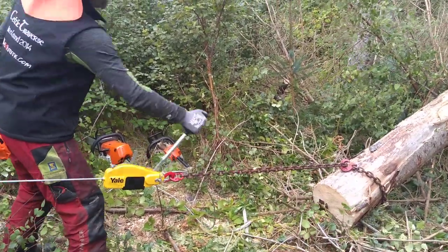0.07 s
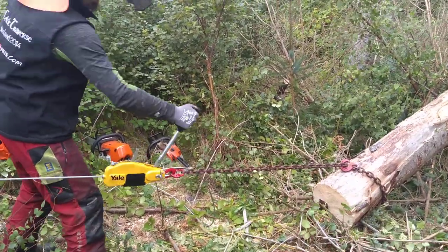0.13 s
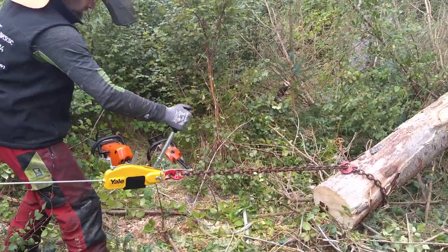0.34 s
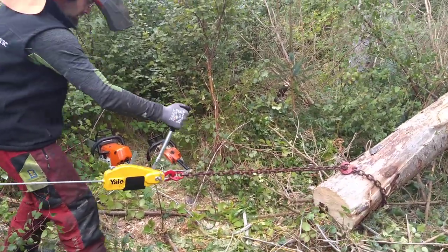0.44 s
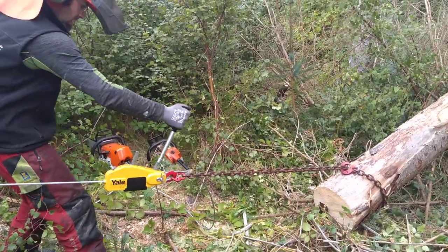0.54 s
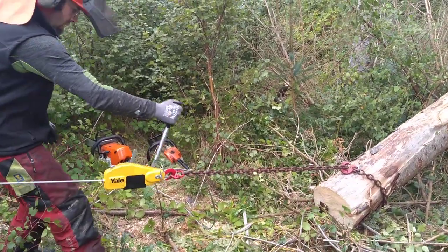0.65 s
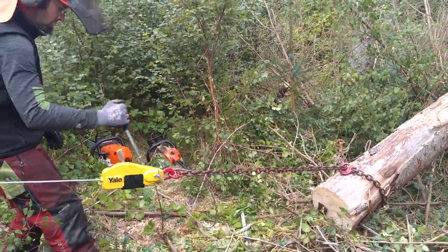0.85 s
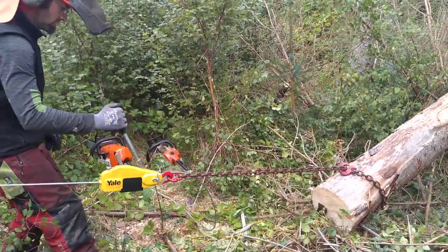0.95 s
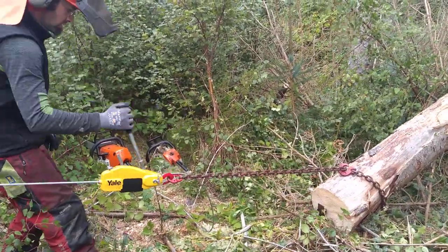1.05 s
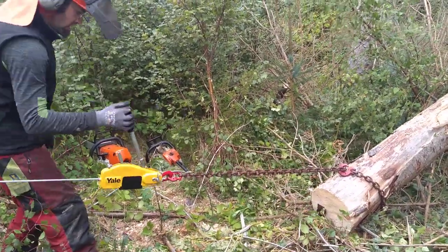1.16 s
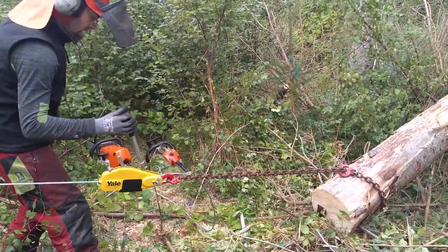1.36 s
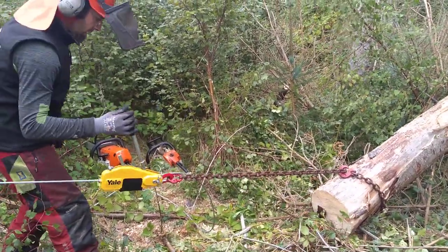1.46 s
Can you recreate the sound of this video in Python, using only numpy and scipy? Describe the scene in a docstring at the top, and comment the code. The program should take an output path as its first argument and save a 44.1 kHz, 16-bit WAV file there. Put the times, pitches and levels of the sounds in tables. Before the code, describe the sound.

A hand winch ratchets a few metres ahead in quiet woodland. Ringing metallic clacks cluster from 0.2 to 0.3 seconds, come doubled near 0.5, 0.65 and 0.8, then bunch again around 1.0. To the left, clothes and leaves rustle softly, boots scuff and twigs tick. A boot lands on dry leaves at 1.2 seconds, and two faint winch clicks follow near 1.45.

```python
"""In woodland, a few metres away, someone works the lever of a hand winch. Its pawl (the catch that
stops it unwinding) clacks over the toothed wheel, often twice, and makes the metal housing ring.
To the left, clothes and leaves rustle, twigs tick, boots shift and one comes down on dry leaves.
Quiet air lies behind it all. The recorder widens the sound of its two microphones by feeding
each into the other, late and upside down."""
import sys
import numpy as np
from scipy import signal
from scipy.fft import rfft, irfft
from scipy.io import wavfile

SR = 44100
rng = np.random.default_rng(int(sys.argv[2]) if len(sys.argv) > 2 else 0)


def generate_wav(sig):
    """Save sig (samples, or channels by samples) to the path in sys.argv[1] as 16-bit PCM at SR."""
    pcm = np.round(np.clip(np.atleast_2d(sig).T, -1, 1) * 32767).astype(np.int16)
    wavfile.write(sys.argv[1], SR, pcm)


N = 66150  # 1.5 seconds


def undb(db):
    """Turn decibels into a number to multiply by."""
    return 10 ** (np.asarray(db) / 20)


def shape(x, points):
    """Change the tone of a sound along a curve of points: f/Hz, level/dB."""
    hz, db = np.array(points, float).T
    f = np.maximum(np.fft.rfftfreq(x.shape[-1], 1 / SR), 1)
    gain = undb(np.interp(np.log(f), np.log(hz), db))
    return irfft(rfft(x) * gain, x.shape[-1])


def noise(tone):
    """Noise of the given tone and strength 1, as two microphones close together hear it."""
    # how much the two differ, least in the low middle range: f/Hz, level/dB
    side_tone = [(50, 4), (130, -2), (280, -9), (700, -5), (1500, 0), (3000, -0.5)]
    mid, side = shape(rng.standard_normal((2, N)), tone)
    pair = mid + shape(side, side_tone) * np.array([[1], [-1]])
    return pair / pair.std()


def fade(start, t60, rise):
    """Rise quickly at the start time, then die away by 60 dB in t60; all times in seconds."""
    age = np.maximum(np.arange(N) / SR - start, 0)
    return (1 - np.exp(-age / rise)) * np.exp(-np.log(1000) * age / t60)


def flutter(depth_db=3, touches_per_s=1000):
    """Many tiny touches of leaves and cloth make the loudness flutter at random."""
    wobble = np.interp(np.arange(N) / SR * touches_per_s, np.arange(N), rng.standard_normal(N))
    gain = undb(depth_db * wobble)
    return gain / np.sqrt(np.mean(gain ** 2))


def woodland_air():
    """The air makes a quiet, steady, low rush."""
    # tone of the air: f/Hz, level/dB
    air_tone = [(25, 2), (60, 3), (110, 3.5), (300, -0.5), (600, -8.5), (1200, -10), (2200, -18),
                (3200, -23), (6000, -25), (14000, -36.5)]
    return undb(-52.5) * noise(air_tone)


def rustle():
    """Clothes and leaves brush together in a hiss that swells and sinks."""
    # loudness of the rustle: t/s, level/dB
    swells = [(0, -51), (.15, -54.5), (.3, -56), (.45, -63), (.6, -84), (.8, -66), (.9, -55), (.99, -43.5),
              (1.045, -53.5), (1.073, -47.5), (1.14, -58), (1.2, -62.5), (1.38, -68), (1.5, -91)]
    # its tone: f/Hz, level/dB
    rustle_tone = [(150, -15.5), (400, 3.5), (1200, 5.5), (2200, 3), (3400, 6), (5500, -3.5), (8000, -6.5),
                   (11000, -12), (14500, -20.5)]
    level_db = np.interp(np.arange(N) / SR, *np.array(swells).T)
    return undb(level_db) * noise(rustle_tone) * flutter()


def twigs():
    """Twigs tick, each a tiny burst of bright noise."""
    # the ticks: t/s, level/dB
    ticks = [(0.462, -47), (0.8533, -40), (0.926, -39), (1.066, -39.5), (1.2238, -33.5), (1.237, -37)]
    # their tone: f/Hz, level/dB
    tick_tone = [(300, -9), (1500, 1.5), (5500, 1.5), (9000, -5), (14000, -10)]
    return noise(tick_tone) * sum(undb(db) * fade(start, t60=.024, rise=.00089) for start, db in ticks)


def shuffling_boots():
    """Boots shift on the ground with dull scuffs."""
    # the scuffs: t/s, level/dB
    scuffs = [(.0, -49.5), (0.824, -47.5), (.89, -58), (1.058, -47), (1.178, -59.5)]
    # their tone: f/Hz, level/dB
    scuff_tone = [(60, -38), (200, 13), (420, 7.5), (800, -17), (2500, -21.5)]
    return noise(scuff_tone) * sum(undb(db) * fade(start, t60=.34, rise=.0077) for start, db in scuffs)


def footstep(start=1.21):
    """A boot lands with a soft thud, and the dry leaves under it crunch just after."""
    # tone of the thud: f/Hz, level/dB
    thud_tone = [(25, -26), (50, -3), (90, 8.5), (200, 5), (420, 5), (800, -7), (2000, -14.5)]
    # tone of the crunch: f/Hz, level/dB
    crunch_tone = [(200, 1), (1100, -20), (2200, 6.5), (4000, 7), (7500, 1.5), (11000, -7), (14500, -12)]
    thud = undb(-33) * noise(thud_tone) * fade(start, t60=.21, rise=.0048)
    soft_sole = signal.butter(2, 1320, fs=SR, output="sos")  # a soft sole makes no treble
    crunch = undb(-36.5) * noise(crunch_tone) * flutter() * fade(start + .0145, t60=.35, rise=.0011)
    return signal.sosfilt(soft_sole, thud) + crunch


def winch():
    """Each blow of pawl and lever snaps, scrapes, knocks the works and sets the housing ringing."""
    # the blows, with levels relative to each other:
    # t/s, level/dB, knock f/Hz, main ring/dB, clink/dB, ping/dB, top/dB
    clacks = [(0.1807, -27, 1253, 2.5, 7.5, 0.5, -14), (0.191, -32, 1150, 8.5, 0, -4, -10),
              (0.2047, -17.5, 1143, -15, -8, 1, -3.5), (.2105, -19, 1024, -9.5, 3, -0.5, -12),
              (0.2305, -21.5, 1230, -33, 4, 8.5, 0), (0.236, -24, 1130, 6.5, 2, 7, 10.5),
              (0.2405, -4.5, 1188, -8, -2.5, -2, -3), (0.2504, -20.5, 956, -33, -2, -7, 8.5),
              (0.2524, -19, 1150, 9, -6, 9.5, 3.5), (.2874, -16.5, 1130, 1, -3.5, -3, -4.5),
              (0.3137, -34, 1125, 6.5, 19, -3, -1), (.3179, -22, 1140, -3, -1.5, 9.5, 4),
              (0.4864, -21.5, 1115, -23, 3, 0, -15), (0.4927, -26, 1215, 0, 1.5, -5, -6.5),
              (.6357, -20, 1114, -1.5, 2, 0, -8), (0.6431, -24, 1174, -4, 5, -2, -3.5),
              (0.7664, -22, 1163, -8, 7.5, 0.5, -5.5), (0.7714, -29.5, 1053, 4.5, 10.5, 5, -3),
              (0.9441, -21, 1130, -4, -8, -8, 2.5), (0.967, -43.5, 1150, -21, 20.5, 31, -22),
              (0.9797, -20, 1030, -1, -10, -1, -6), (0.9845, -35.5, 1070, -27, 10, -5, 24),
              (0.9974, -26.5, 1390, -29, 12.5, 10.5, 6), (1.001, -29.5, 1380, -25, 15.5, 2, 8),
              (1.012, -21.5, 1125, -12, -5, -12, -10), (1.017, -33.5, 1120, -21, -5, -1, 12.5),
              (1.179, -40.5, 880, -26, -22, 1, 7), (1.441, -40, 1160, -3, 1, 3, 2),
              (1.468, -35, 1080, -2, -1, -4.5, -17)]
    # where a blow's tone is set (a point held at 0 dB, then clink, ping and top): f/Hz
    tone_hz = [1150, 1500, 3000, 7000]
    # the housing's notes besides its main ring: f/Hz, level/dB, time to fall by 60 dB/s
    housing_notes = [(283.4, -34.5, 0.2), (795, -18, .055), (945, -16.5, 0.047), (1226, -14, 0.028),
                     (1333, -11, 0.038), (1553, -23.5, 0.088), (1751, -19, 0.054), (2775, -18, 0.047),
                     (3060, -22, 0.05), (3183, -17, .045), (3624, -27.5, 0.085), (4280, -14, 0.023),
                     (4870, -29, 0.09), (6350, -23, 0.078), (7400, -44, 0.014), (9740, -45, 0.012)]
    main_hz, treble_hz = 1102.4, 1936
    out, size = np.zeros((2, N)), SR // 4
    t = np.arange(size) / SR
    rise = lambda seconds: 1 - np.exp(-t / seconds)
    fall = lambda t60: np.exp(-np.log(1000) * t / t60)
    ring = lambda hz, t60, phase: np.sin(2 * np.pi * hz * t + phase) * fall(t60)
    scrape = noise([(100, -71), (280, -0.5), (520, -27.5), (850, 1), (1400, 2.5), (2000, -9.5),
                    (3100, -11.5), (5300, -19), (9300, -19), (12000, -31.5), (14000, -48)])  # tone of metal scraping on metal: f/Hz, level/dB
    for start, db, knock_hz, ring_db, *treble_db in clacks:
        tone_db = [0, *treble_db]
        in_step = 2 * np.pi * main_hz * start  # each blow starts in step with the main note
        knock = undb(3) * ring(knock_hz, t60=.024, phase=in_step)
        loaded_hz = main_hz * (1 + .009 * rng.standard_normal())  # the cable's load shifts the pitch
        metal = knock + undb(ring_db - 2) * ring(loaded_hz, t60=.091, phase=in_step)
        for hz, note_db, t60 in housing_notes:
            phase = in_step + 1.23 * rng.standard_normal()  # the notes start only roughly together
            # high notes reach the two microphones less in step
            phase = phase + .97 * min(hz / treble_hz, 2) ** 2 * rng.standard_normal((2, 1))
            boost_db = np.interp(np.log(hz), np.log(tone_hz), tone_db)
            gain = undb(note_db + boost_db + 3 * rng.standard_normal())
            note_hz = hz * (1 + .0095 * rng.standard_normal())
            metal = metal + gain * ring(note_hz, t60, phase)
        fresh_scrape = np.roll(scrape, rng.integers(N), axis=1)[:, :size]
        crack = shape(fresh_scrape, list(zip(tone_hz, tone_db)))
        crack *= undb(-9) * fall(.014) + undb(-15) * fall(.087)  # short snap, longer scrape
        blow = metal * rise(.0014) + crack * rise(.0003)
        first = int(start * SR)
        out[:, first:first + size] += (undb(db) * blow)[:, :N - first] / 2
    return out


def widen(pair, delay_s=.000469, share=.62):
    """The recorder feeds each microphone into the other, late and upside down."""
    delay = np.exp(-2j * np.pi * np.fft.rfftfreq(N, 1 / SR) * delay_s)
    late = irfft(rfft(pair[::-1]) * delay, N)
    return pair - share * late


def scene():
    """The winch ahead, the worker to the left and quiet air all round, all widened by the recorder."""
    # how much louder the worker is on the left than on the right: f/Hz, level/dB
    left_lead = [(100, 4), (400, 7), (2500, 0.5), (6000, 2.5), (9000, 12.5), (14000, 9.5)]
    left, right = widen(rustle() + twigs() + footstep() + shuffling_boots())
    left = shape(left, [(hz, db / 2) for hz, db in left_lead])
    right = shape(right, [(hz, -db / 2) for hz, db in left_lead])
    return widen(winch() + woodland_air()) + np.array([left, right])


def record(dry):
    """The recorder thins the bass below 70 Hz and cuts the treble above 14300 Hz."""
    bass_cut = signal.butter(2, 70, "high", fs=SR, output="sos")
    treble_cut = signal.ellip(8, .2, 70, 14300, fs=SR, output="sos")
    return signal.sosfilt(treble_cut, signal.sosfilt(bass_cut, dry))


dry = scene()
out = record(dry)
generate_wav(out)
```